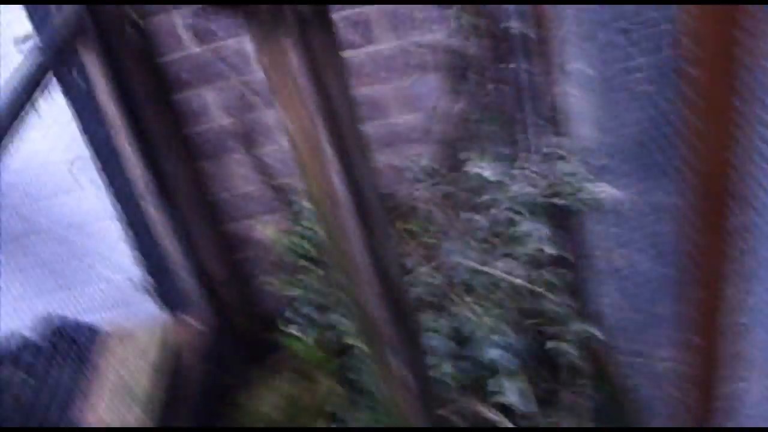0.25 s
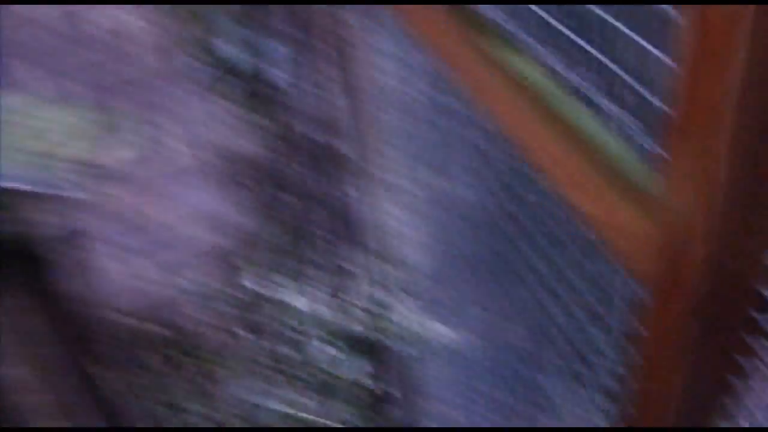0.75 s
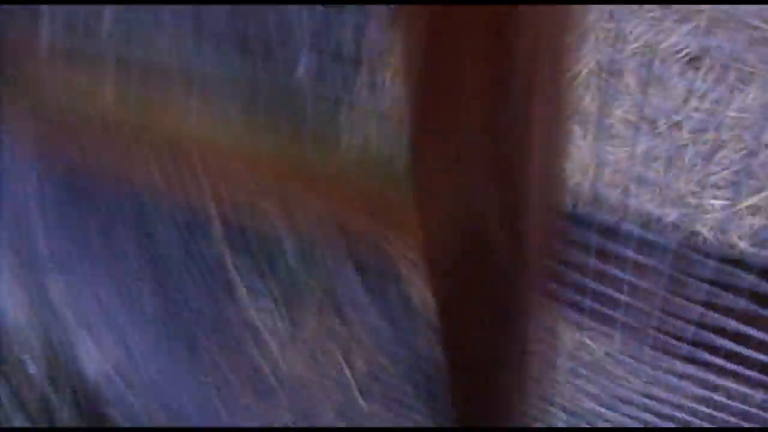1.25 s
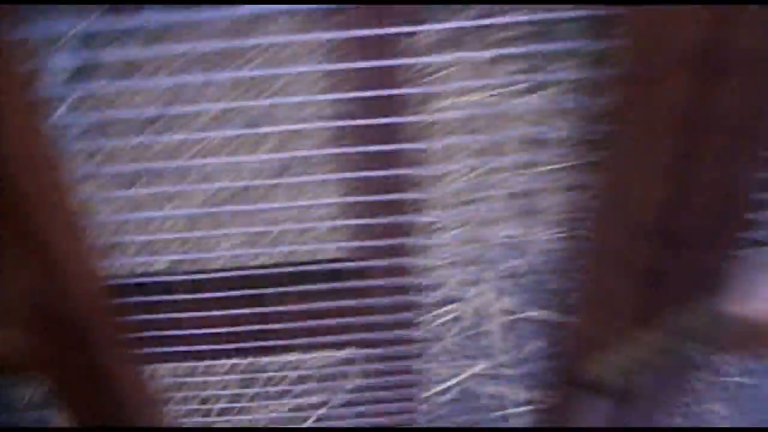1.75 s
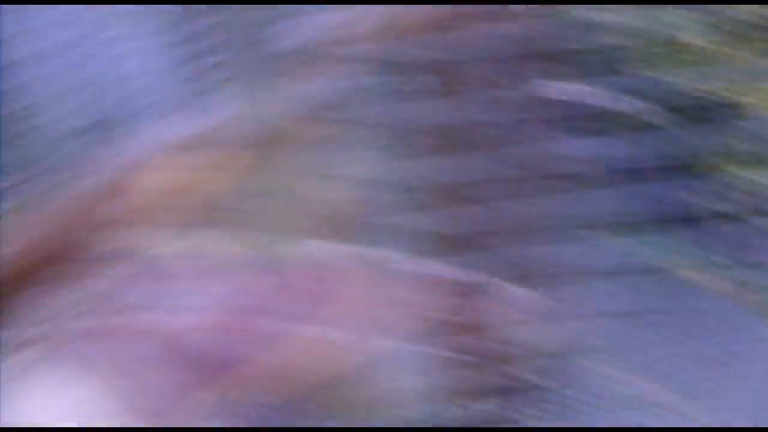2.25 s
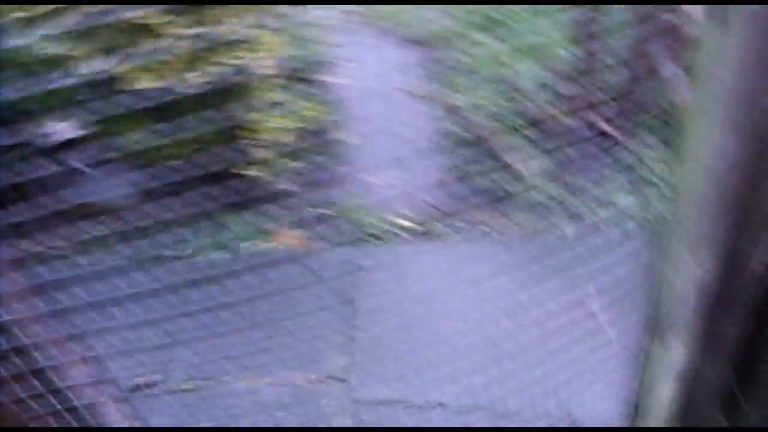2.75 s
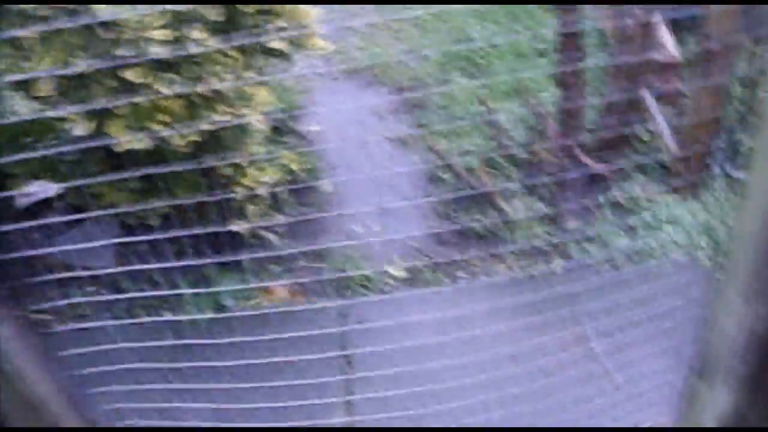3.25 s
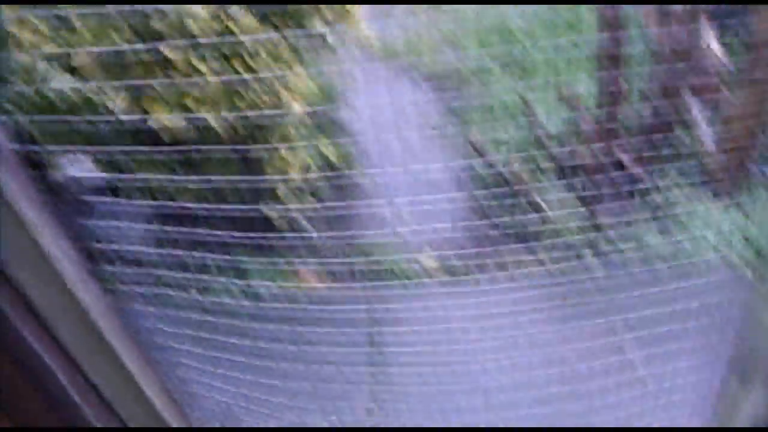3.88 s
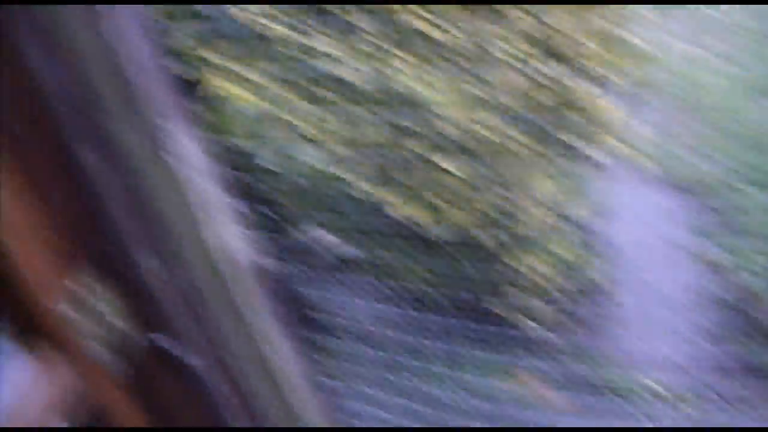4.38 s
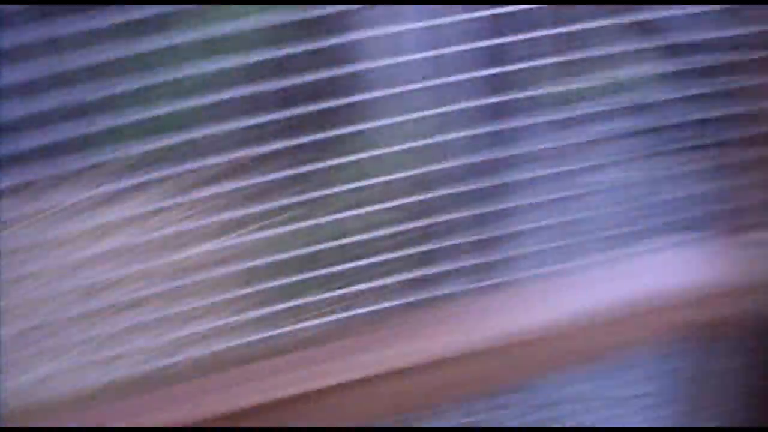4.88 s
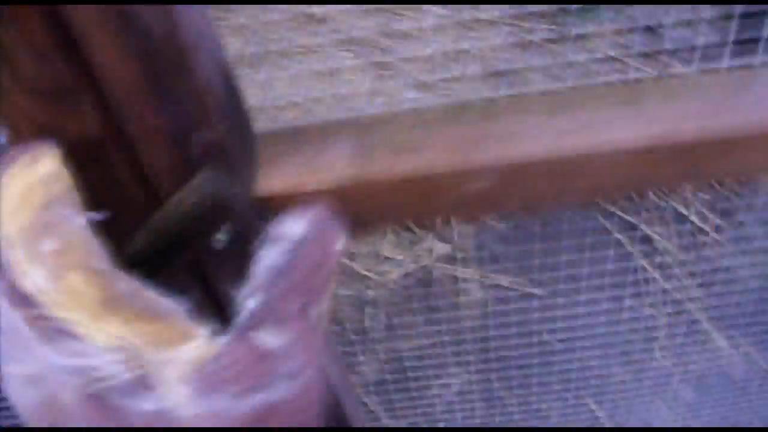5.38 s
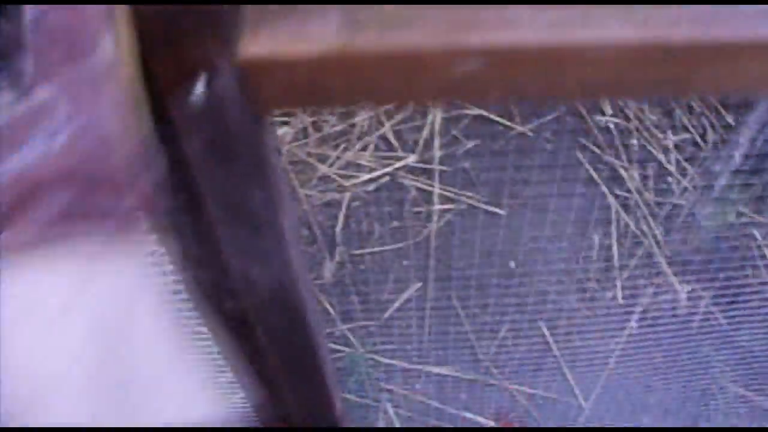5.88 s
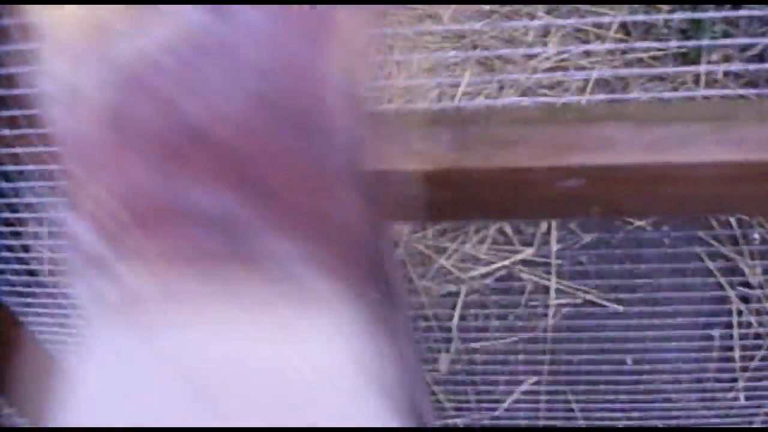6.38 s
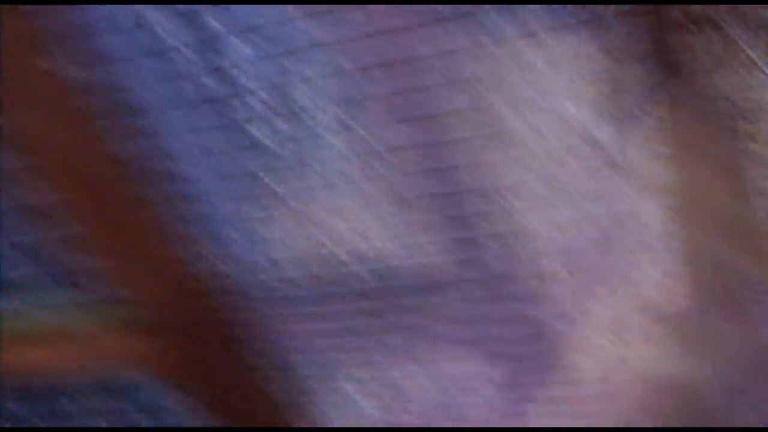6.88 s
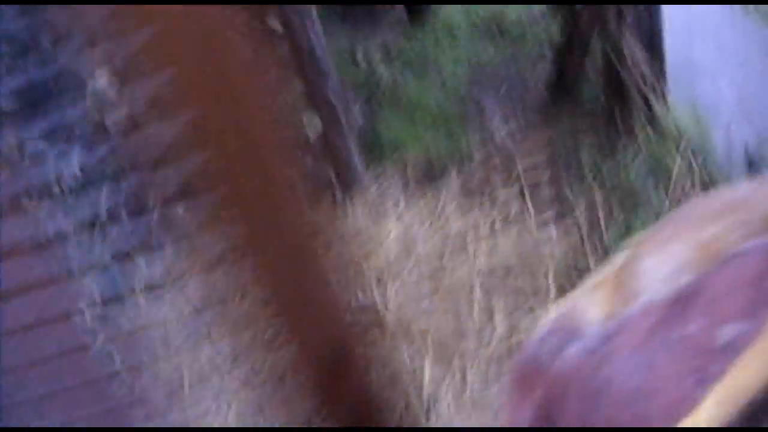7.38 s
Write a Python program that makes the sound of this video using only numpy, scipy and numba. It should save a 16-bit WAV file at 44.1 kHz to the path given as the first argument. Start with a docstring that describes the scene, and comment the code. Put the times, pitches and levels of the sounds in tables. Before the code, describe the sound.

Outdoors in a wood and mesh aviary, soft air noise and low distant traffic lie underneath, the traffic swelling near 2.4 seconds and later fading. Faint breathy wheezes open the scene until about 1 second, with light clicks from 0.3 to 0.7. A dense flurry of wooden knocks, bright ticks and mesh scraping runs from 1.0 to 1.4. An owl's harsh, slightly whistling hiss then swells from 1.4 and cuts off around 2.6. At 3.1 the door clacks sharply, with rustling and smaller knocks to 3.6; a tiny latch clinks around 3.9. It is quieter until weak ticks and a wheeze near 5.3, then light scrapes at 5.6 and 5.8. A second rasping hiss lasts from 6.3 to 7.4, with small clicks and one bright snap at 6.8, ending in a faint wheeze. Straw ticks sparsely throughout; the close microphone has dull treble.

```python
"""In an outdoor aviary of wood and wire mesh an owl hisses twice, with faint wheezes around the calls:
turbulent breath through throat resonances. A gloved hand works the door: clicks ring the modes of frame,
mesh and a small metal latch, and friction grains rustle in mesh and straw. Stalks of straw tick faintly.
A distant hum of air and traffic, made of noise bands, lies below; a small microphone dulls the treble."""
import sys
import numpy as np
from scipy import signal
from scipy.io import wavfile
from numba import njit

SR = 44100
rng = np.random.default_rng(int(sys.argv[2]) if len(sys.argv) > 2 else 0)


def wav_record(signal):
    """Record a signal, one row per channel, as 16-bit PCM in the file named by sys.argv[1]."""
    frames = np.transpose(np.atleast_2d(signal))
    bounded = np.clip(frames, -1, 1)
    # unit amplitude maps onto the largest positive 16-bit level
    quanta = np.round(bounded * 32767).astype(np.int16)
    wavfile.write(sys.argv[1], SR, quanta)


N = 336924   # samples

# Modes of the wooden frame. Each row: frequency in Hz, relative level in dB, decay time by 60 dB in seconds.
WOOD_MODES = [(234, -4, 0.013), (332, -16, 0.042), (476, 10, 0.0074), (670, 12, 0.016), (852, 5, 0.028),
              (985, 5, 0.0089)]
# Modes of the wire mesh. Each row: frequency in Hz, relative level in dB, decay time by 60 dB in seconds.
MESH_MODES = [(1454, -6, 0.032), (1845, 9.5, 0.017), (2227, 10.5, 0.0093), (2586, 13, 0.01),
              (3124, 10, 0.013)]
# Modes of the bright tick. Each row: frequency in Hz, relative level in dB, decay time by 60 dB in seconds.
TICK_MODES = [(3750, 4, 0.012), (4660, 5.5, 0.0057), (5140, 7, 0.0059), (5970, -2.5, 0.0057),
              (7500, -5, 0.0034)]


def from_db(db):
    """A level in decibels is twenty times the logarithm of an amplitude ratio."""
    return 10 ** (np.asarray(db) / 20)


def rms_one(x):
    """Normalisation: dividing by the root mean square gives unit mean power."""
    return x / np.sqrt(np.mean(x ** 2) + 1e-20)


def drift(rate_hz):
    """Slow random fluctuation: noise through a double one-pole low-pass; rms 1."""
    r = np.exp(-2 * np.pi * rate_hz / SR)
    noise = rng.standard_normal(N + SR)
    settled = signal.lfilter([1], [1, -2 * r, r * r], noise)[SR:]
    return rms_one(settled)


@njit
def resonance(x, turn, r):
    """Two-pole resonance: a damped oscillator whose centre (radians a sample) may move."""
    y = np.zeros(len(x))
    for i in range(2, len(x)):
        drive = (1 - r * r) / 2 * (x[i] - x[i - 2])
        y[i] = drive + 2 * r * np.cos(turn[i]) * y[i - 1] - r * r * y[i - 2]
    return y


def tuned(x, hz, width_hz):
    """Cascaded resonance: two equal passes deepen the valleys beside the peak."""
    turn = 2 * np.pi * hz / SR * np.ones(N)
    r = np.exp(-np.pi * width_hz * 1.5 / SR)   # each pass is wider, as the cascade narrows the peak
    return resonance(resonance(x, turn, r), turn, r)


def body(x, peaks):
    """Modal sum: parallel resonances with alternating signs; rms 1."""
    total = 0
    for k, (hz, width_hz, db) in enumerate(peaks):
        total = total + (-1) ** k * from_db(db) * tuned(x, hz, width_hz)
    return rms_one(total)


def ring(clicks, hz, t60):
    """Impulse response of one mode: a unit click starts a decaying sine of initial height 1."""
    r, w = from_db(-60 / (t60 * SR)), 2 * np.pi * hz / SR
    return signal.lfilter([0, np.sin(w)], [1, -2 * r * np.cos(w), r * r], clicks + 1e-18)


def breath():
    """Turbulent flow noise, amplitude-modulated as the folds of the windpipe chop it unevenly."""
    flutter_hz, flutter_depth = 284, 0.27   # centre of the unsteady rate; modulation depth
    phase = 2 * np.pi * np.cumsum(flutter_hz * (1 + 0.29 * drift(57.44))) / SR
    chopping = 1 + flutter_depth * np.cos(phase)
    return rng.standard_normal(N) * chopping * from_db(1.3 * drift(18))


def hisses():
    """Source and filter: breath through seven throat resonances; three of them slide as the gape changes."""
    # Course of each hiss. Each row: time in seconds, effort in dB, lowest resonance in Hz, its level beside
    # the effort in dB, third resonance in Hz, fourth resonance in Hz, lead of the upper resonances in dB.
    hiss_rows = [
        [(1.36, -65, 1910, 9, 3620, 4860, 13.5), (1.55, -52, 1844, -3.5, 3750, 4550, 3),
         (1.72, -49.5, 1913, 1.5, 3920, 5140, 4.5), (1.92, -49, 1816, -4.5, 3980, 4930, 3),
         (2.07, -46, 1812, -15.5, 3950, 4800, 1), (2.19, -46.5, 1735, -5.5, 3780, 5100, 6),
         (2.32, -46.5, 1743, -2.5, 3720, 4900, 0.5), (2.45, -44, 1764, -4, 3650, 4370, -2),
         (2.6, -47, 1740, -7, 3670, 4800, 0.5)],
        [(6.33, -55.5, 1890, -3, 4260, 4770, 2.5), (6.5, -49.5, 1840, -8.5, 3770, 4190, -1),
         (6.6, -48.5, 1770, -13, 3310, 4140, -8), (6.67, -49, 1642, -20, 3410, 4900, -2),
         (6.77, -46, 1613, -10, 3610, 4770, 7), (6.88, -48.5, 1612, -1, 3790, 5440, 4),
         (7.05, -46, 1766, -1.5, 3730, 5055, 5.5), (7.18, -44, 1770, -5.5, 3770, 4780, 0),
         (7.3, -45.5, 1707, -4, 3806, 4900, 2.5), (7.42, -47.5, 1645, -9.5, 3700, 4900, 2)],
    ]
    # Edges of each hiss. Each row: swell before its first row in seconds, cut after its last in seconds.
    edges_s = [(.03, 0.051), (0.034, 0.041)]
    # Steady resonances: two, then five to seven. Each row: centre in Hz, level beside the effort in dB,
    # share of the upper lead added to it (ratio).
    steady = [(2615, -9.5, 0.21), (5977, -10, 0.98), (7280, -12, -0.6), (6400, -16.5, -0.0015)]
    # Widths of the resonances in Hz: one to four, then the upper three.
    widths_hz = [106, 430, 500, 450, 393, 410, 300]
    # Broad air noise between the resonances. Each row: centre in Hz, width in Hz, relative level in dB.
    rasp_bands = [(1470, 1240, 0.5), (1983, 290, 11), (3090, 310, 5.5), (4370, 540, 9), (5160, 740, 8),
                  (9900, 6000, -8.5)]
    # Whistle weight in the lowest resonance at the start of each hiss (ratio).
    whistle_shares = [.75, .45]
    rasp_db, whistle_jitter_hz = -1, 80
    streak_width_hz, streak_db, streak_hold_s = 95, -6.5, .1   # hold is the mean time between jumps
    wander, wander_db = 0.037, 0.5   # slow chance in place (ratio) and level of the steady resonances
    near_lag_s, near_db = .0035, -8

    flow, t = breath(), np.arange(N) / SR
    opened = 0
    for rows, (swell, cut) in zip(hiss_rows, edges_s):
        start, end = rows[0][0], rows[-1][0]
        opened = opened + np.interp(t, [start - swell, start, end, end + cut], [0, 1, 1, 0]) ** 2
    s, *columns = np.transpose(np.concatenate(hiss_rows))
    effort_db, first_hz, first_db, third_hz, fourth_hz, upper_db = [np.interp(t, s, c) for c in columns]

    second, *upper = [(hz * (1 + wander * drift(3.7)), db + share * upper_db + wander_db * drift(3.4))
                      for hz, db, share in steady]
    third = (third_hz, -0.44 * upper_db)   # sinks as the upper ones rise
    fourth = (fourth_hz, -5.5 + 0.99 * upper_db)
    throat = [(first_hz, first_db), second, third, fourth, *upper]

    out = from_db(rasp_db) * body(breath(), rasp_bands)
    for k, ((hz, db), width_hz) in enumerate(zip(throat, widths_hz)):
        broad = rms_one(tuned(flow, hz, width_hz))
        # a thin strand inside the resonance holds a pitch, then jumps
        jumps = np.flatnonzero(rng.random(N) < 1 / (streak_hold_s * SR))
        last = np.searchsorted(jumps, np.arange(N)) % len(jumps)
        held_hz = hz[jumps] + .22 * width_hz * rng.standard_normal(len(jumps))
        streak = rms_one(tuned(flow, held_hz[last], streak_width_hz))
        voice = broad + streak * from_db(streak_db + 1.5 * drift(6.1))
        if k == 0:
            share = np.interp(t, [rows[0][0] for rows in hiss_rows], whistle_shares)
            whistle_hz = hz + whistle_jitter_hz * drift(90)
            whistle = np.sin(2 * np.pi * np.cumsum(whistle_hz) / SR)
            voice = np.sqrt(1 - share) * voice + 2 * np.sqrt(share) * whistle
        out += (-1) ** k * from_db(db) * voice
    out *= from_db(effort_db)

    # a wall close by: its echo shifts as the microphone turns
    lag = near_lag_s * SR * (1 + .03 * drift(.8))
    out += from_db(near_db) * np.interp(np.arange(N) - lag, np.arange(N), out)
    return opened * out


def wheezes():
    """Source and filter again: weak breath, coloured by the resonances of a nearly shut beak."""
    # Faint wheezes. Each row: start in seconds, end in seconds, level at start in dB, level at end in dB.
    wheeze_rows = [(0, 0.276, -66, -60), (0.473, 1, -58.5, -63.5), (5.304, 5.53, -62.5, -63),
                   (7.467, 7.642, -63, -70)]
    # Beak resonances, one list for the first two wheezes and one for the later ones.
    # Each row: centre in Hz, width in Hz, relative level in dB.
    beak_early, beak_late = [
        [(2580, 780, 11), (3670, 2300, -0.5), (4900, 330, 7), (6060, 1900, -8.5)],
        [(2380, 1200, 1), (3580, 260, 6.5), (4320, 850, -1.5), (6230, 3900, -16)],
    ]
    edge_s = 0.063   # swell and fade at either end

    flow, t = breath(), np.arange(N) / SR
    gains = []
    for start, end, start_db, end_db in wheeze_rows:
        level = from_db(np.interp(t, [start, end], [start_db, end_db]))
        gains.append(level * np.interp(t, [start - edge_s, start, end, end + edge_s], [0, 1, 1, 0]))
    return sum(gains[:2]) * body(flow, beak_early) + sum(gains[2:]) * body(flow, beak_late)


def strike(times, levels_db, length, modes, weight_db=0):
    """Modal excitation: a click and its dying rattle of smaller clicks drive every mode unequally."""
    count, span = len(times), 2000   # blows; samples of rattle
    rattle = rng.standard_normal((count, span)) * (rng.random((count, span)) < .2)
    rattle = 0.24 * rattle * from_db(-20 * np.arange(span) / SR / length)   # 20 dB down after length
    rattle[:, 0] = 1
    at = np.round(times * SR).astype(int)
    octaves_below = np.log2(640 / np.transpose(modes)[0])   # negative above 640 Hz
    spread_db = rng.normal(0, 2.5, (count, len(modes)))
    spread_db = spread_db + np.outer(weight_db * np.ones(count), octaves_below)
    out = np.zeros(N)
    for k, (hz, db, t60) in enumerate(modes):
        clicks = np.zeros(N + span)
        for i in range(count):
            height = from_db(levels_db[i] + db + spread_db[i, k]) / len(modes)   # the modes share the peak
            clicks[at[i]:at[i] + span] += height * rattle[i]
        out += ring(clicks[:N], hz, t60)
    # little bass, and a soft contact that excites little far above the top mode
    band_hz = [0.98 * modes[0][0], 1.53 * modes[-1][0]]
    return signal.sosfilt(signal.butter(2, band_hz, "band", fs=SR, output="sos"), out)


def knocks():
    """Impact on coupled bodies: frame, mesh and tick share each blow; weight tilts it to low frame modes."""
    # Knocks. Each row: time in seconds, drive of wood, of mesh and of tick in dB,
    # weight as the gain of the wood modes in dB per octave below 640 Hz.
    knock_rows = [(0.337, -60.5, -52.5, -50, -1), (0.418, -64, -50, -47.5, 0.1),
                  (0.4403, -46, -49, -47, -5), (0.4605, -72, -53, -61, 0.1), (0.51, -65, -49, -59, 0.1),
                  (0.5258, -54.5, -51.5, -43, 0.1), (0.6666, -67, -41.5, -47, -5),
                  (0.6918, -58, -44, -47, -6), (1.023, -66, -60, -57, -6), (1.0811, -31, -36.5, -43, 11),
                  (1.1095, -30.5, -36, -36, 7), (1.1362, -32, -33.5, -19, 0), (1.154, -37, -28, -23, -14),
                  (1.1601, -31, -34.5, -27.5, 16), (1.1825, -39, -36.5, -40, 0), (1.2218, -44, -38, -69, 5),
                  (1.232, -52, -37.5, -32.5, -9), (1.289, -34, -50, -27, 2), (1.2919, -43, -48, -28, 7),
                  (1.2973, -44.5, -45, -36, -5), (1.3031, -40.5, -45, -39, 4), (1.3083, -44, -41, -45, 3),
                  (1.382, -61, -36, -45, 0), (1.392, -44, -52, -44, -9), (1.414, -36, -40, -23, -17),
                  (1.4195, -47, -36, -30, -11), (1.426, -59, -46, -26, -2), (1.432, -59, -42, -33, 3),
                  (2.1551, -45.5, -48, -51, 1), (3.016, -63, -43.5, -43, 4), (3.112, -45.5, -56, -29, 7),
                  (3.1381, -31.5, -39, -45, 5), (3.142, -31.5, -18.5, -16, 2),
                  (3.1454, -27.5, -30, -35, -8), (3.1577, -48, -29, -44, 2), (3.183, -38.5, -29.5, -29, 12),
                  (3.491, -50, -51, -57, 2), (3.498, -33, -42.5, -55, -15.5), (3.523, -56, -45, -45, 13),
                  (3.5465, -41.5, -41, -33.5, 8), (3.5583, -48, -45, -39, 7), (4.03, -44, -54, -49, 11.5),
                  (4.515, -65, -62, -44, 0), (5.269, -68, -48.5, -31.5, 0), (5.275, -70, -64, -37, -2),
                  (5.628, -75, -74, -35.5, 0.1), (5.8256, -49.5, -50, -45, 9), (6.351, -52, -34, -48, -2),
                  (6.3675, -48.5, -31.5, -37, -7), (6.879, -41, -36, -39, -8)]
    # Time for the rattle to fall 20 dB in wood, mesh and tick, in seconds.
    wood_s, mesh_s, tick_s = [.013, .007, .006]

    s, wood_db, mesh_db, tick_db, weight_db = np.transpose(knock_rows)
    wood = strike(s, wood_db, wood_s, WOOD_MODES, weight_db)
    mesh = strike(s, mesh_db, mesh_s, MESH_MODES)
    tick = strike(s, tick_db, tick_s, TICK_MODES)
    return wood + mesh + tick


def latch():
    """Free vibration of a small metal part: short touches set its modes ringing."""
    # Touches of the latch. Each row: time in seconds, drive in dB.
    clinks = [(3.89, -32), (3.896, -40), (3.902, -33), (3.9254, -25.5), (3.938, -35), (3.955, -32.5)]
    # Metal modes. Each row: frequency in Hz, relative level in dB, decay time by 60 dB in seconds.
    metal_modes = [(1960, 4, 0.022), (2630, 8.5, 0.055), (3820, -6, .015), (8300, -11, 0.049)]
    s, drive_db = np.transpose(clinks)
    return strike(s, drive_db, 0.0025, metal_modes)


def rustles():
    """Friction: dense uneven grains, in clumps, excite modes that the rubbing hand damps."""
    # Rustles. Each row: peak time in seconds, swell over 20 dB in seconds, fade over 20 dB in seconds,
    # scrape level in the mesh, tick and wood modes in dB.
    rustle_rows = [(0.24, 0.083, 0.017, -60, -60, -77), (0.7, 0.036, 0.019, -49.5, -65, -56),
                   (1.029, 0.022, 0.023, -49.5, -55, -79), (1.095, 0.045, 0.057, -46, -48.5, -51),
                   (1.15, 0.028, 0.06, -42, -43.5, -76), (1.176, 0.026, 0.043, -53, -56, -44),
                   (1.24, 0.083, 0.11, -57, -61, -54), (1.296, 0.082, 0.033, -40, -43, -46.5),
                   (1.381, 0.069, 0.12, -42.5, -45, -60), (1.421, 0.019, 0.0087, -35, -39, -33.5),
                   (3.029, 0.14, 0.26, -60.5, -71, -75), (3.127, 0.018, 0.27, -41.5, -51, -51),
                   (3.149, 0.018, 0.099, -44, -48, -39), (3.269, 0.082, 0.089, -47.5, -60.5, -51.5),
                   (3.499, 0.0088, 0.15, -50, -66, -48.5), (3.533, 0.028, 0.14, -47, -55.5, -49),
                   (3.861, 0.013, 0.25, -49, -56, -54.5), (3.892, 0.029, 0.063, -47, -53, -47.5),
                   (4.527, 0.076, 0.029, -64.5, -65, -69), (4.851, 0.28, 0.047, -60, -65.5, -75),
                   (5.278, 0.013, 0.044, -60, -63, -64), (5.479, 0.019, 0.02, -66, -66, -54),
                   (5.621, 0.051, 0.032, -51.5, -54, -63), (5.821, 0.069, 0.051, -51, -56, -57.5)]

    sizes = from_db(1.27 * np.minimum(rng.exponential(1, N), 4.0)) * rng.choice([-1, 1], N)
    grains_per_s = 2200 * from_db(2.5 * drift(40))
    grains = sizes * (rng.random(N) < grains_per_s / SR)
    parts = []
    for modes in (MESH_MODES, TICK_MODES, WOOD_MODES):
        damped = [(hz, 7.62 / t60, db) for hz, db, t60 in modes]   # wider than the free modes
        parts.append(body(grains, damped))
    t, power = np.arange(N) / SR, np.zeros((len(parts), N))
    for peak, swell, fade, *levels_db in rustle_rows:
        near = slice(max(int((peak - 3 * swell) * SR), 0), int((peak + 3 * fade) * SR))
        shape_db = -20 * np.maximum((peak - t[near]) / swell, (t[near] - peak) / fade)
        power[:, near] += from_db(np.add.outer(levels_db, shape_db)) ** 2
    return np.sum(np.sqrt(power) * parts, axis=0)


def straw():
    """Random point process: dry stalks tick faintly, in clusters, as the rate drifts."""
    snaps_per_s = 11 * from_db(8.0 * drift(2))
    snaps = (rng.random(N) < snaps_per_s / SR) * rng.standard_normal(N)
    return from_db(-68) * sum(ring(snaps, hz, t60) for hz, db, t60 in TICK_MODES[:-1])


def air():
    """Shaped broadband noise: half-octave bands follow a spectrum, each swaying a little."""
    # Spectrum of the outdoor air. Each row: frequency in Hz, relative density in dB per Hz.
    spectrum = [(12, -32), (20, -9), (113, -9), (186, -18.5), (314, -9.5), (466, -17), (644, -12),
                (1060, -16), (1260, -17), (3650, -23), (7500, -41.5), (9750, -78.5), (16500, -120)]
    hz, density_db = np.transpose(spectrum)
    edges_hz = 15 * 2 ** np.arange(0, 9.6, .5)
    white = rng.standard_normal((2, N + SR))   # neighbouring bands take different noises
    together = drift(.6)
    out = 0
    for k, (low, high) in enumerate(zip(edges_hz, edges_hz[1:])):
        band = signal.sosfilt(signal.butter(2, [low, high], "band", fs=SR, output="sos"), white[k % 2])[SR:]
        level_db = np.interp(np.log(low * high) / 2, np.log(hz), density_db)
        out = out + band * from_db(level_db + .7 * together + .9 * drift(3))
    return from_db(-62) * rms_one(out)


def drone():
    """Band-limited noise: far traffic in a few low bands swells and fades."""
    # Course of the drone. Each row: time in seconds, level in dB.
    course = [(0, -64.5), (.8, -68), (2.4, -62), (4.0, -66.5), (4.8, -72.5), (6.5, -81), (7.64, -83)]
    # Bands of the drone. Each row: centre in Hz, width in Hz, relative level in dB.
    low_bands = [(73, 44, -4), (192, 44, 2), (315, 54, 7), (606, 570, -4)]
    s, level_db = np.transpose(course)
    gain = from_db(np.interp(np.arange(N) / SR, s, level_db))
    return gain * body(rng.standard_normal(N), low_bands)


def scene():
    """Superposition: near sounds with dull reflections, over the outdoor air and the drone."""
    # Reflections from wall and ground. Each row: delay in seconds, level in dB.
    reflections = [(.013, -14), (.029, -25)]
    near = hisses() + wheezes() + knocks() + latch() + rustles() + straw()
    dull = signal.lfilter([.5], [1, -.5], near)
    for s, db in reflections:
        delay = round(s * SR)
        near[delay:] += from_db(db) * dull[:N - delay]
    return (near + air() + drone())[None]


def record(dry):
    """Transducer response: treble falls in two low-pass steps, with a narrow dip and faint self-noise."""
    mic_hz, mic_top_hz, cutoff_hz = 6086, 9900, 15600
    snap_s, snap_db, snap_width_s = 6.786, -28, 8e-5
    dip_hz, dip_width_hz, dip_share = 5470, 360, 0.49
    self_noise_db = -99

    x = signal.sosfilt(signal.butter(6, mic_hz, fs=SR, output="sos"), dry)
    # one bare snap skips the first step, so it is brighter than all else
    x = x + from_db(snap_db) * np.exp(-abs(np.arange(N) / SR - snap_s) / snap_width_s)
    x = signal.sosfilt(signal.butter(6, mic_top_hz, fs=SR, output="sos"), x)
    x = x - dip_share * tuned(x[0], dip_hz, dip_width_hz)   # the housing takes out a narrow dip
    x = x + from_db(self_noise_db) * rng.standard_normal(x.shape)
    return signal.sosfilt(signal.cheby2(12, 60, cutoff_hz, fs=SR, output="sos"), x)


dry = scene()
out = record(dry)
wav_record(out)
```